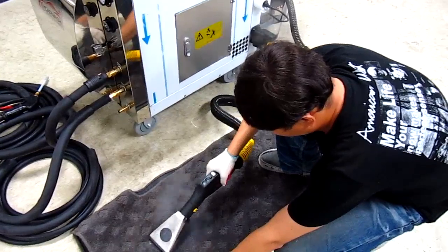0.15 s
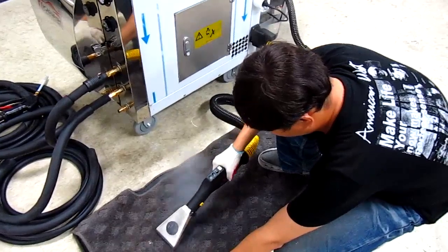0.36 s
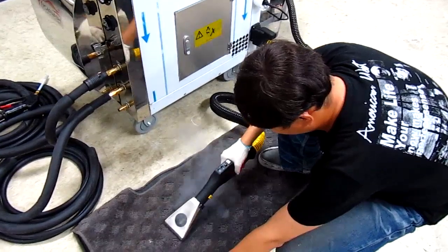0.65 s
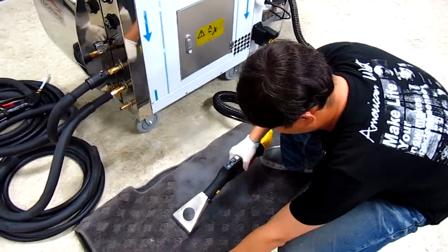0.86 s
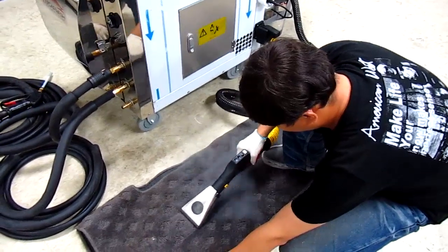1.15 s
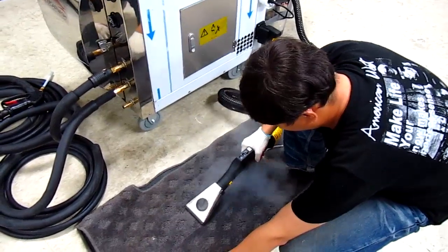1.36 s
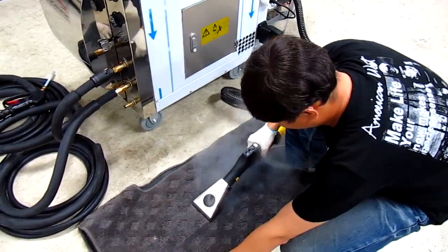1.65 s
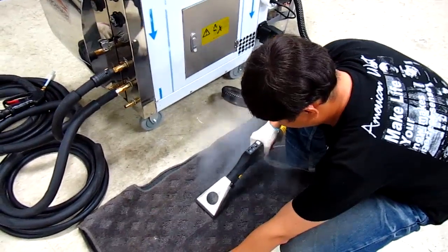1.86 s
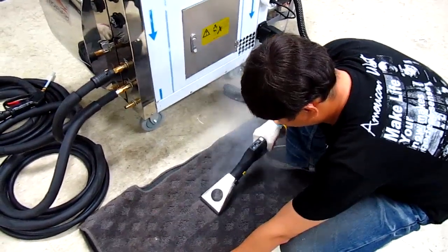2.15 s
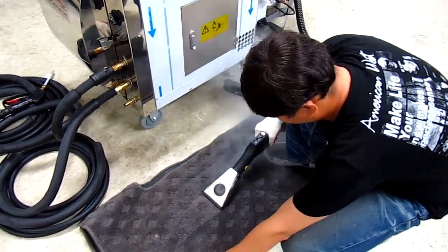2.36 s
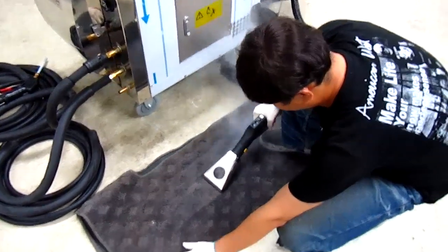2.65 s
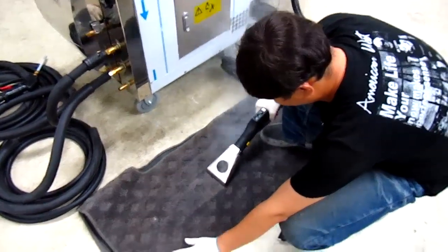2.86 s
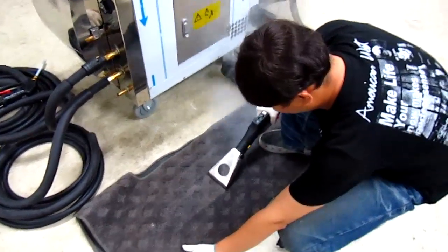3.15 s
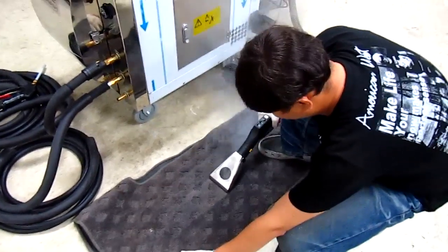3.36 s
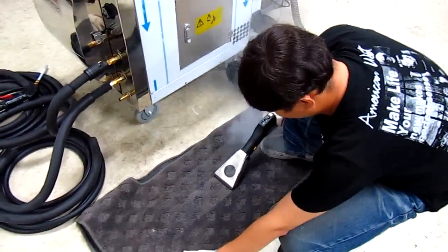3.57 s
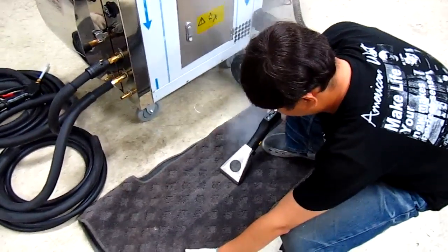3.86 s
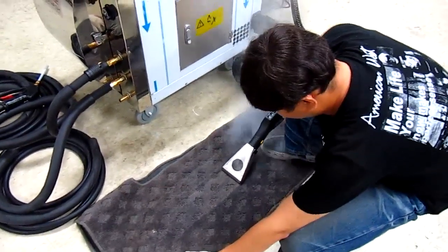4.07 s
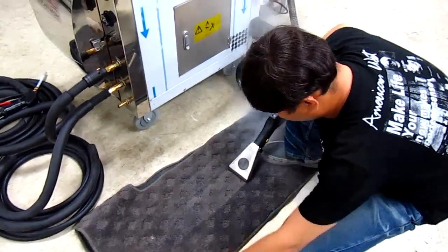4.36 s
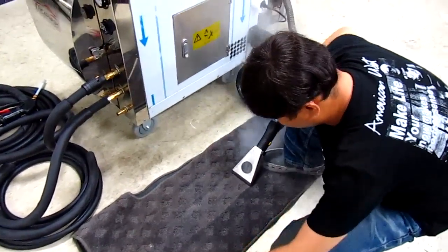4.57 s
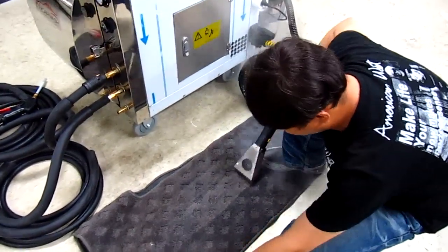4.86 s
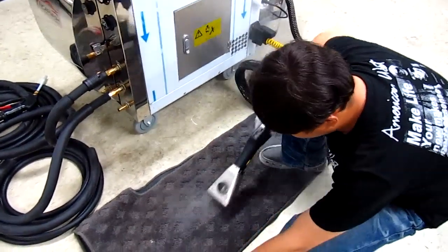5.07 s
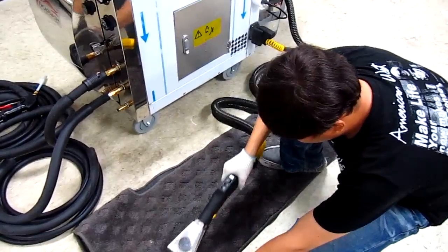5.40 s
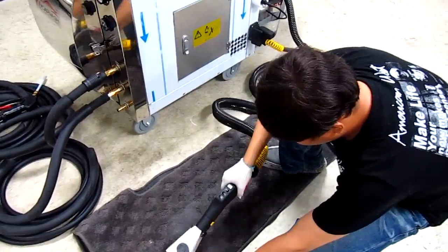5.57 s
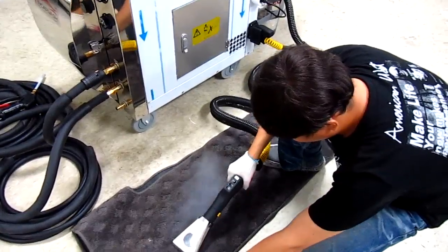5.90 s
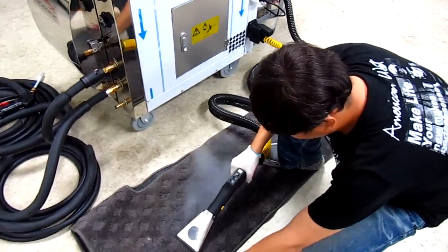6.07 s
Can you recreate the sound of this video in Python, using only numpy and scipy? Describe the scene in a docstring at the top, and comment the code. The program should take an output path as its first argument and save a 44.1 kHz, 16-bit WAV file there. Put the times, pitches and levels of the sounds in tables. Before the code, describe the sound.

From the start a steam cleaner runs at full power, close by on a workshop floor: a steady suction-motor hum around 340 Hz with fan whine above it, thick exhaust roar, hose rush and bright fluttering steam hiss. From about 0.6 s the gap under the nozzle adds a breathy, thin singing near 7 kHz as it is drawn over a mat. Small wet spits tick at 2.7 and 3.2 s, and the singing grows clearer around 3 s. Near 3.8-4.2 s the steam weakens and the singing slides lower; a sharp spit bursts at 4.2 s, then steam spurts back and the hose gulps at 4.4 s. The motor slows slightly, its hum swelling while the whine thins, recovering by 5.5-6 s as thin whistling returns. At 6.16 s everything cuts abruptly to a loud, wide, bright spray-gun jet, over a low roar that quickly dies away.

```python
"""A steam cleaner's suction motor hums and whines from the start, in exhaust roar, hose rush and steam hiss.
From 0.6 s the gap under the nozzle sings as the nozzle is drawn over a floor mat; water spits from 2.7 s.
About 4.2 s steam flow dips and returns, the hose gulps, the shaft slows and the hum swells.
At 6.16 s the scene cuts abruptly to the bare jet of a spray gun.
Motor: sines at shaft orders. Air, steam, water: shaped noise. Singing, boom: noise resonances."""
import sys
import numpy as np
from scipy import signal
from scipy.fft import rfft, irfft, next_fast_len
from scipy.io import wavfile
from scipy.ndimage import uniform_filter1d, map_coordinates

SR = 44100
rng = np.random.default_rng(int(sys.argv[2]) if len(sys.argv) > 2 else 0)


def unload_audio(sound):
    """Save the sound as a 16-bit wav file, at the path given as the first command line argument."""
    columns = np.transpose(np.atleast_2d(sound))
    # keep every value between -1 and 1, then stretch to whole-number steps
    steps = np.round(np.clip(columns, -1, 1) * 32767)
    wavfile.write(sys.argv[1], SR, steps.astype(np.int16))


N = 275184
CUT_S = 6.158

# stereo image of the cleaner's noise: f/Hz, left-right correlation
CLEANER_CORRELATION = [(30, .6), (80, 0.97), (600, 0.96), (1400, 1), (3000, 0.99), (6000, 0.95),
                       (9000, 0.7), (14000, 0.3)]
# shaft speed, slowed by the air moved when the nozzle lifts: t/s, f/Hz (turns per second)
SHAFT_SPEED = [(0.2, 340.5), (1.3, 341.4), (2.3, 341.7), (3.7, 341.6), (4.0, 340.5), (4.3, 338.7),
               (4.65, 338.2), (5.2, 339.6), (5.9, 340.7)]
# fan whine as the nozzle seals and lifts, before trim: t/s, order 3 level/dB, order 5 level/dB, order 6 level/dB
FAN_WHINE = [(0.1, -31.5, -31.0, -31), (0.75, -28, -39, -38.5), (1.9, -26, -37, -30),
             (2.6, -25, -32.0, -31.5), (3.2, -28, -33, -36), (3.9, -28.0, -31, -32.5),
             (4.25, -38.5, -33.5, -37), (4.55, -36.5, -36.5, -37), (4.8, -43, -29.5, -39),
             (5.15, -45, -34, -36.5), (5.5, -35.0, -37, -29.0), (6.0, -30.5, -36, -31)]


def motor():
    """One suction pulse per fan turn; turbulence jostles each order, the room scatters the upper ones."""
    # hum, swelling when the nozzle lifts, before trim: t/s, order 1 level/dB, order 2 level/dB
    hum_levels = [(0.1, -14.5, -23.5), (1.1, -17.0, -24), (1.8, -16.5, -22.5), (2.9, -18.5, -23.0),
                  (3.8, -18.0, -20.0), (4.15, -14.0, -18.0), (4.7, -13.0, -19.5), (5.2, -14.5, -20),
                  (6.0, -15.5, -20.5)]
    # faint overtones: shaft order, level/dB with the nozzle sealed
    faint_orders = [(3.5, -53), (7, -39), (12, -40)]
    faint_db_per_hz = -2  # they fade as the shaft slows
    fourth_offset_db, third_share = -2.5, 0.36  # order 4 relative to a blend of orders 3 and 6

    speed_hz, = curves(SHAFT_SPEED)
    first_db, second_db = curves(hum_levels)
    third_db, fifth_db, sixth_db = curves(FAN_WHINE)
    fourth_db = fourth_offset_db + third_share * third_db + (1 - third_share) * sixth_db
    angle = 2 * np.pi * np.cumsum(speed_hz + 0.1985 * wobble(12)) / SR

    first_db = first_db + 0.46 + 0.3 * wobble(8) + 0.56 * wobble(30)
    hum = tone(angle, first_db, skew_rad=0.025)
    second_db = second_db + 0.55 + 0.69 * wobble(8.9) + 1.0 * wobble(32)
    hum += tone(2 * angle + 0.16 * wobble(40), second_db, skew_rad=0.15)
    for order, level_db in enumerate((third_db, fourth_db, fifth_db, sixth_db), 3):
        scatter_rad = (order - 2) * 0.32 * wobble(0.6) + 0.1 * wobble(30)
        level_db = level_db + 0.25 + 0.8 * wobble(14)
        hum += tone(order * angle + scatter_rad, level_db, skew_rad=0.091 * wobble(1.4))
    for order, sealed_db in faint_orders:
        level_db = sealed_db + faint_db_per_hz * shaft_sag_hz() + 1.5 * wobble(5)
        hum += tone(order * angle + 0.2 * wobble(33), level_db, skew_rad=0.12)
    return -hum * balance(0.35)


def tone(angle, level_db, skew_rad):
    """Stereo sine, rms level_db; standing waves put the ears skew_rad apart in phase."""
    ear_phase = np.array([[-0.5], [0.5]]) * skew_rad
    return np.sqrt(2) * amp(level_db) * np.cos(angle + ear_phase)


def shaft_sag_hz():
    """Drop of the shaft below its sealed speed under the load of air."""
    sealed_hz = 341.7
    return sealed_hz - curves(SHAFT_SPEED)[0]


def airflow():
    """Exhaust and hose turbulence, with the air of tank and hose ringing as noise resonances."""
    # noise shapes: f/Hz, relative level/dB per Hz
    exhaust_spectrum = [(20, -38), (50, -36), (80, -15), (130, -12), (200, -2), (300, -2.5), (400, -2),
                        (530, -4.5), (690, 3.5), (800, -3.5), (950, -21.5), (1500, -35), (4000, -67)]
    hose_spectrum = [(400, -24), (850, 1.5), (1150, 2), (1750, 2.5), (2170, 0), (2450, 3), (3050, 2),
                     (3500, -1.5), (3900, -9), (4400, -2.5), (6000, -10.5), (12000, -42)]
    # level laws: sealed level at usual flow/dB, slope/dB per dB of steam flow, slope/dB per Hz of shaft sag
    exhaust_law = (-23, 0.02, 0.042)
    hose_law = (-23, 0.4, 0.046)
    # air columns of the hose: f/Hz, width/Hz, level/dB
    hose_columns = [(396, 4.7, -36), (486, 30, -35), (1195, 14, -39), (2873, 45, -41), (3005, 35, -38.5)]
    boom_mean_db, boom_db_per_whine_db = -35.8, 0.2  # the tank booms most while the nozzle seals
    gulp_start_s, gulp_length_s, gulp_db = 4.38, 0.18, 1.5  # gulp of air as the steam returns

    exhaust_db = flow_level_db(exhaust_law) + 0.55 * wobble(18)
    exhaust = amp(exhaust_db) * rush(exhaust_spectrum, CLEANER_CORRELATION, patchy_db=0.98)

    _, gulp = swell(gulp_start_s, gulp_length_s)
    hose_db = flow_level_db(hose_law) + gulp_db * gulp + 0.4 * wobble(30)
    hose = amp(hose_db) * rush(hose_spectrum, CLEANER_CORRELATION, patchy_db=1.0)

    ringing = np.zeros((2, N))
    for hz, width_hz, level_db in hose_columns:
        ringing += amp(level_db) * resonance(hz, width_hz, side_db=-22.0)
    third_db = curves(FAN_WHINE)[0]
    boom_db = boom_mean_db + boom_db_per_whine_db * (third_db - third_db.mean())
    ringing += amp(boom_db) * resonance(centre_hz=95.6, width_hz=11.5, side_db=-19)
    return exhaust + hose + ringing * balance(0.9)


def nozzle():
    """Air hisses through the mat and sings in the gap; wet steam flutters on top."""
    # noise shapes: f/Hz, relative level/dB per Hz
    hiss_spectrum = [(2000, -47), (3900, -6.5), (4400, -5), (5100, 0.5), (6100, 4), (7000, 1.5),
                     (8400, -0.5), (9200, -3.5), (10200, -5), (11100, -9.5), (13000, -14), (15000, -40)]
    steam_spectrum = [(3000, -31), (7000, 8.5), (9000, 6), (10500, 3), (11200, -1.5), (12500, 1.5),
                      (13300, -3.5), (14200, -6), (15000, -21)]
    # level laws: sealed level at usual flow/dB, slope/dB per dB of steam flow, slope/dB per Hz of shaft sag
    hiss_law = (-23.5, 0.68, -0.56)
    steam_law = (-27, 1.7, -.1)

    flutter = wobble(45)
    hiss_db = flow_level_db(hiss_law) + 0.38 * flutter
    hiss = amp(hiss_db) * rush(hiss_spectrum, CLEANER_CORRELATION, patchy_db=0.87)
    steam_db = flow_level_db(steam_law) + 0.5 * flutter + 0.63 * wobble(140)
    steam = amp(steam_db) * rush(steam_spectrum, CLEANER_CORRELATION, patchy_db=1.2)
    return (hiss + gap_song() + steam) * balance(0.3)


def gap_song():
    """Air rings in the gap under the nozzle, gliding as the gap changes, and whistles at the lip."""
    # gap resonance over the mat: start/s, length/s, first f/Hz, last f/Hz, level/dB
    gap_swells = [(0.598, 2.1, 6650, 6650, -29.5), (2.82, .93, 7570, 7150, -25),
                  (3.75, .55, 5500, 4600, -34), (4.26, .24, 4500, 5600, -25.5),
                  (4.499, .62, 6150, 6390, -29), (5.2, .36, 5350, 5890, -28)]
    # thin whistles at the lip: start/s, length/s, f/Hz, level/dB
    lip_whistles = [(.65, .8, 6930, -32), (2.8, 0.67, 7030, -32), (5.3, 1, 6980, -34)]

    song = np.zeros((2, N))
    for start_s, length_s, first_hz, last_hz, level_db in gap_swells:
        progress, envelope = swell(start_s, length_s)
        centre_hz = first_hz + (last_hz - first_hz) * progress + 70 * wobble(15)
        gain = envelope * amp(level_db + wobble(18))
        song += gain * resonance(centre_hz, width_hz=480, side_db=-17)
    for start_s, length_s, hz, level_db in lip_whistles:
        _, envelope = swell(start_s, length_s)
        gain = envelope * amp(level_db + 1.5 * wobble(9.2))
        song += gain * resonance(hz + 30 * wobble(6), width_hz=85, side_db=-14)
    return song


def flow_level_db(law):
    """Level of an air layer that follows steam flow and shaft sag."""
    # steam flow, briefly shut off and spurting back: t/s, level/dB
    steam_flow = [(0.0, -31.5), (0.15, -33.5), (0.82, -33.5), (1.25, -33.5), (1.53, -31.5), (2.36, -33),
                  (3.38, -32), (3.69, -31), (3.81, -35.5), (4.18, -38.5), (4.2, -35), (4.22, -35),
                  (4.44, -30.5), (4.56, -34.5), (6.03, -34), (6.13, -35)]
    usual_flow_db = -33
    base_db, db_per_flow_db, db_per_sag_hz = law
    flow_change_db = curves(steam_flow)[0] - usual_flow_db
    return base_db + db_per_flow_db * flow_change_db + db_per_sag_hz * shaft_sag_hz()


def spits():
    """Each slug of condensed water leaves the nozzle as a short, bright, decaying noise burst."""
    # sputters: t/s, level/dB, t60/s
    spit_events = [(2.702, -27, .03), (3.216, -23, 0.034), (4.018, -30, .04), (4.191, -13.5, .05),
                   (4.286, -27, 0.033)]
    # noise shape: f/Hz, relative level/dB per Hz
    splash_spectrum = [(1500, -20), (4000, 1), (6500, 0), (9000, 5), (11000, -8), (13300, -10),
                       (15000, -12)]
    attack_s = 0.0012

    bursts = np.zeros(N)
    for start_s, level_db, t60_s in spit_events:
        age_s = np.maximum(np.arange(N) / SR - start_s, 0)
        bursts += amp(level_db - 60 * age_s / t60_s) * (1 - np.exp(-age_s / attack_s))
    return bursts * rush(splash_spectrum, CLEANER_CORRELATION, patchy_db=2)


def spray_gun():
    """Free steam jet: wide, bright noise with two resonances, over a low roar that dies away."""
    # noise shapes: f/Hz, relative level/dB per Hz
    jet_spectrum = [(30, -34), (90, -24), (260, -22.5), (750, -5.5), (1200, -0.5), (1700, 0), (2200, -1.5),
                    (2900, -2.5), (4100, -11), (5400, -3.5), (7300, -3), (10000, -6), (13000, -14),
                    (15000, -26)]
    roar_spectrum = [(40, -16), (100, -1), (260, 0), (600, -7), (1500, -20), (5000, -65)]
    # stereo image: f/Hz, left-right correlation
    jet_correlation = [(200, -0.84), (1200, -0.34), (2400, -0.059), (5000, .35), (14000, .3)]
    jet_db, roar_db, roar_t60_s = -12.5, -17.5, 0.27

    jet = amp(jet_db) * rush(jet_spectrum, jet_correlation, patchy_db=0)
    tip = amp(-29) * resonance(centre_hz=7350, width_hz=350, side_db=-9)
    tip += amp(-33) * resonance(centre_hz=2950, width_hz=130, side_db=2)
    age_s = np.maximum(np.arange(N) / SR - CUT_S, 0)
    roar_gain = amp(roar_db - 60 * age_s / roar_t60_s)
    return jet + tip + roar_gain * rush(roar_spectrum, jet_correlation, patchy_db=-2)


def handling():
    """Faint handling rumble: low noise with soft bell-shaped bumps."""
    # bumps: t/s (peak 0.03 s later), level/dB
    soft_bumps = [(2.69, -46), (3.24, -52), (3.98, -50), (4.26, -44)]
    # noise shape: f/Hz, relative level/dB per Hz
    rumble_spectrum = [(10, -4), (30, -2), (60, -1), (150, -4), (400, -38)]

    t_s = np.arange(N) / SR
    gain = amp(-66) * np.ones(N)
    for bump_s, level_db in soft_bumps:
        gain += amp(level_db) * np.exp(-((t_s - bump_s - 0.03) / 0.037) ** 2)
    return gain * rush(rumble_spectrum, [(30, 0.55)], patchy_db=4)


def walls(x):
    """Echoes from the floor and the cabinet comb the noise with fine ripples."""
    # echoes: delay/ms, gain
    wall_echoes = [(1.9, 0.041), (3.4, 0.043), (4.7, 0.013), (7.3, 0.065), (11.6, 0.02), (17.1, 0.074)]

    def response(hz):
        """Direct sound plus delayed copies."""
        return 1 + sum(gain * np.exp(-2j * np.pi * hz * ms * 1e-3) for ms, gain in wall_echoes)

    return filtered(x, response)


def rush(spectrum, correlation, patchy_db):
    """Turbulent stereo noise of rms 1, with time-frequency patches of random gain."""
    bins = signal.stft(rng.standard_normal((2, N)), nperseg=512)[2]
    field = rng.standard_normal(bins.shape[1:])
    field = uniform_filter1d(uniform_filter1d(field, size=7, axis=0), size=9, axis=1)
    pair = signal.istft(bins * amp(patchy_db * unit(field)), nperseg=512)[1][:, :N]

    def response(hz):
        """Mid and side gains that give the spectrum and the correlation."""
        turn = np.arccos(np.clip(along(correlation, hz), -1, 1)) / 2
        return amp(along(spectrum, hz)) * [np.cos(turn), np.sin(turn)]

    mid, side = filtered(pair, response)
    return unit(np.array([mid + side, mid - side]))


def resonance(centre_hz, width_hz, side_db):
    """Stereo noise of rms 1 in one resonance: slow noise on a carrier whose frequency may move."""
    slow = filtered(rng.standard_normal((2, 2, N)), lambda hz: 1 / (1 + (hz / width_hz) ** 2))
    phase = 2 * np.pi * np.cumsum(centre_hz * np.ones(N)) / SR
    mid, side = slow[0] * np.cos(phase) + slow[1] * np.sin(phase)
    side = amp(side_db) * side
    return unit(np.array([mid + side, mid - side]))


def swell(start_s, length_s):
    """Progress from 0 to 1, and a half-sine envelope broadened by a power below 1."""
    progress = np.clip((np.arange(N) / SR - start_s) / length_s, 0, 1)
    return progress, np.abs(np.sin(np.pi * progress)) ** 0.35


def wobble(rate_hz):
    """Smooth random curve with rate_hz knots a second."""
    knots = rng.standard_normal(int(N * rate_hz / SR) + 4)
    return map_coordinates(knots, [np.arange(N) * rate_hz / SR])


def curves(rows):
    """One value per sample for each column after the time."""
    t_s, *columns = np.transpose(rows)
    return [np.interp(np.arange(N) / SR, t_s, column) for column in columns]


def along(points, hz):
    """Value at hz from (f/Hz, value) points, on a log frequency axis."""
    f_hz, values = np.transpose(points)
    return np.interp(np.log(hz + 1), np.log(f_hz + 1), values)


def filtered(x, response):
    """x with its spectrum multiplied by response(hz)."""
    size = next_fast_len(N + 8192)
    return irfft(rfft(x, size) * response(np.fft.rfftfreq(size, 1 / SR)), size)[..., :N]


def balance(left_db):
    """Gains of left_db on the left and its opposite on the right."""
    return amp([[left_db], [-left_db]])


def amp(db):
    """Decibels to gain."""
    return 10 ** (np.asarray(db) / 20)


def unit(x):
    """x at rms 1."""
    return x / np.sqrt(np.mean(np.abs(x) ** 2) + 1e-20)


def scene():
    """The cleaner at work, then a hard cut to the spray gun."""
    since_cut_s = np.arange(N) / SR - CUT_S
    cleaner = motor() + walls(airflow() + nozzle() + spits()) + handling()
    fade_out = np.clip(-since_cut_s / 0.0013, 0, 1)
    fade_in = np.clip(since_cut_s / 0.0047, 0, 1)
    return cleaner * fade_out + spray_gun() * fade_in


def record(dry):
    """Round off the highest peaks, then remove everything from the band limit up."""
    top_hz = 14900
    rounded = dry / (1 + np.abs(dry) ** 8) ** (1 / 8)
    return filtered(rounded, lambda hz: hz < top_hz)


dry = scene()
out = record(dry)
unload_audio(out)
```